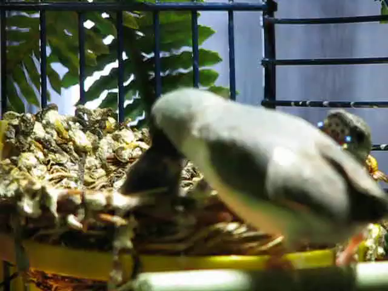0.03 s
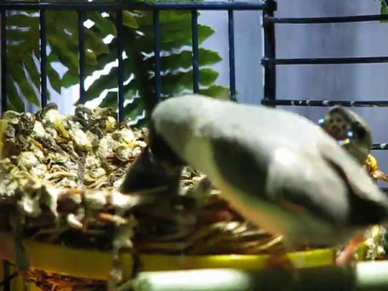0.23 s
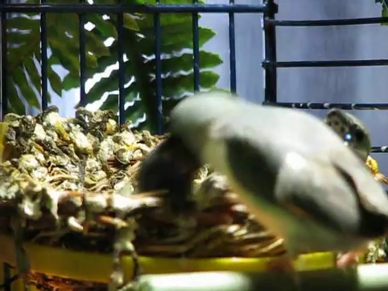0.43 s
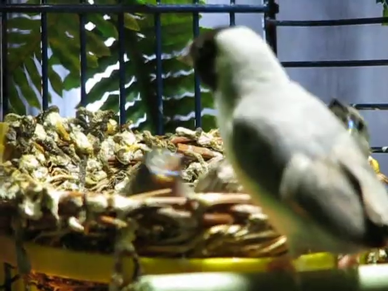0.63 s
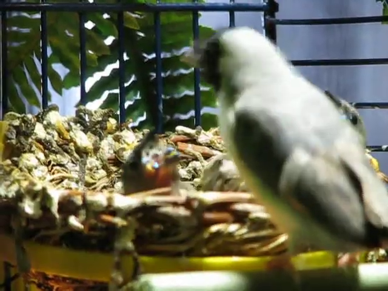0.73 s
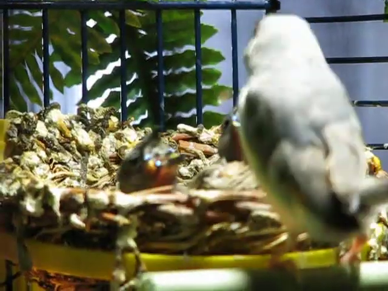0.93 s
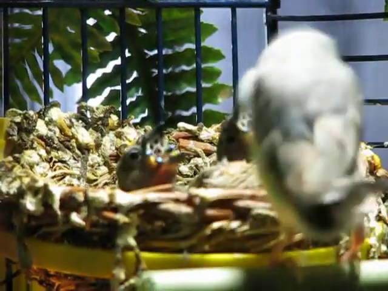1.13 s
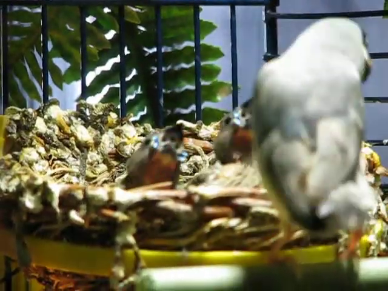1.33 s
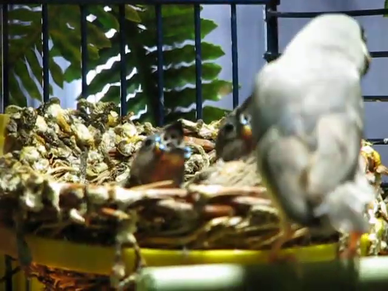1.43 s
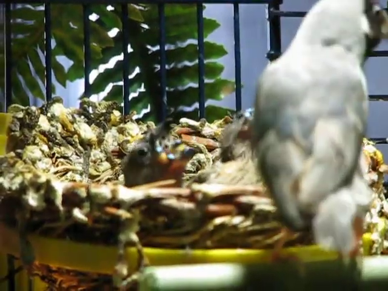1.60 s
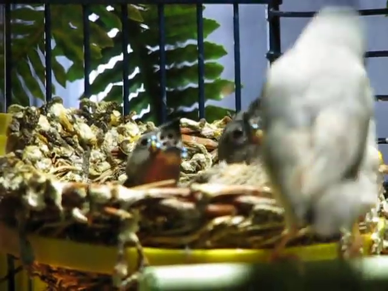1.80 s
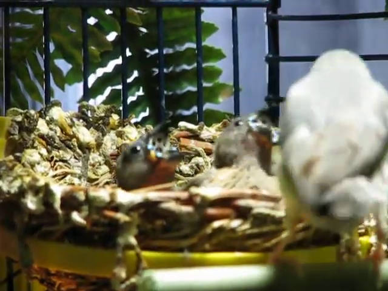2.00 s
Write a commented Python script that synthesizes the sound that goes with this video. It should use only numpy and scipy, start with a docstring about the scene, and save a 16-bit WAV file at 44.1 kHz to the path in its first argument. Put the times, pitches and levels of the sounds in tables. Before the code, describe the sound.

Two finch chicks beg close by in a cage indoors. From about 0.1 seconds, one gives shrill rising whistles that turn hoarse, about four a second. At 0.8 seconds the second chick joins with short raspy cries, about five a second, and both overlap until the end, around 2 seconds. The cage and room ring briefly. Faint household noise and hum continue underneath, with one tiny soft scuff near 0.3 seconds.

```python
"""Indoors, a nest in a cage: two finch chicks beg, close by.
Each cry is a shrill whistle with overtones, turning hoarse as the second side of the syrinx
joins in a little apart in pitch. The cage corner and the room ring briefly.
Behind them: faint household noise and hum, one soft scuff."""
import sys
import numpy as np
from scipy import signal
from scipy.fft import rfft, irfft
from scipy.io import wavfile

SR = 44100
rng = np.random.default_rng(int(sys.argv[2]) if len(sys.argv) > 2 else 0)


def wav_record(signal):
    """Record a signal, one row per channel, as 16-bit PCM in the file named by sys.argv[1]."""
    frames = np.transpose(np.atleast_2d(signal))
    bounded = np.clip(frames, -1, 1)
    # unit amplitude maps onto the largest positive 16-bit level
    quanta = np.round(bounded * 32767).astype(np.int16)
    wavfile.write(sys.argv[1], SR, quanta)


N = 90581
PREROLL = 8820  # samples before time zero
M = N + PREROLL
TIME_S = (np.arange(M) - PREROLL) / SR

# household noise spectrum: freq_hz, relative_db
HOUSE_SPECTRUM = [(25, -69), (90, -37), (170, -8), (500, -7.5), (1100, -10.5), (2300, -18.5), (8000, -23.5),
                  (15000, -43)]
# its stereo width: freq_hz, side_to_mid_db
HOUSE_SIDE = [(100, -24), (300, -21), (600, -14), (5000, -5)]
# hum lines: freq_hz, level_db
HUM_LINES = [(59, -74), (120, -76.5), (478, -60), (620, -63.5)]
# scuff spectrum: freq_hz, relative_db
SCUFF_SPECTRUM = [(1800, -30), (2600, -2), (3800, 0), (4600, -30)]
# open beak and microphone response: freq_hz, gain_db
BEAK_RESPONSE = [(800, -27.5), (1600, -13), (2700, -9.5), (3400, -10), (4200, -12.5), (6000, 5), (6800, 0),
                 (7800, 2.5), (9000, 1), (10000, -1.5), (11000, -7.5), (12500, -19.5), (16000, -17.5)]

# first chick, one contour per cry: time_s, pitch_hz, level_db
FIRST_CRIES = [
    [(-.04, 5440, -14), (.01, 5910, -30)],
    [(.137, 3566, -35), (.158, 4180, -20), (.18, 4200, -19), (.2, 5590, -23.5), (.226, 6035, -30.5),
     (.231, 6035, -22), (.258, 6320, -48.5)],
    [(.374, 3726, -22), (.397, 4410, -20), (.401, 3933, -12.5), (.409, 3970, -21.5), (.42, 4124, -19.5),
     (.437, 5730, -23.5), (.455, 6060, -30.5), (.466, 6220, -20), (.487, 6350, -31.5), (.5, 5800, -58)],
    [(.615, 3694, -28.5), (.635, 4310, -15), (.65, 3970, -19.5), (.67, 4750, -19.5), (.685, 5664, -22.5),
     (.705, 6145, -22.5), (.733, 5537, -34.5)],
    [(.912, 3835, -24), (.93, 3582, -23.5), (.956, 3625, -18.5), (.961, 3913, -10.5), (.99, 4212, -14),
     (1.035, 4040, -15.5), (1.06, 5110, -31.5), (1.085, 5250, -19.5), (1.098, 4600, -67)],
    [(1.157, 3450, -31), (1.168, 3948, -18.5), (1.195, 4216, -12.5), (1.22, 4300, -12.5),
     (1.25, 4944, -19.5), (1.285, 5060, -21), (1.3, 4730, -32)],
    [(1.418, 3942, -14.5), (1.45, 4220, -18.5), (1.48, 4870, -16.5), (1.54, 4936, -26.5), (1.55, 4730, -45)],
    [(1.642, 3890, -20.5), (1.68, 4316, -15.5), (1.715, 5020, -21.5), (1.745, 4950, -26), (1.77, 4200, -47)],
    [(1.9, 3653, -20), (1.912, 3904, -13), (1.94, 4146, -16), (1.99, 4503, -16.5), (2.03, 5070, -19.5),
     (2.06, 5000, -20)],
]
# voice break per cry: hoarseness_before, break_s, hoarseness_after
FIRST_BREAKS = [(.7, -.04, .7), (.6, .15, .8), (.25, .415, .8), (.4, .655, .8), (.4, 1, .9), (.3, 1.2, .95),
                (.45, 1.445, .95), (.6, 1.66, .95), (.65, 1.94, .95)]
# second side below the first, per cry, before wander: max_gap_hz
FIRST_GAPS_HZ = [570, 632, 614, 619, 804, 852, 739, 860, 779]
# harmonics 1-4: gain_db
FIRST_HARMONICS_DB = [3, -4, -8, -8.5]

# second chick, per cry: onset_s, lead_in_s, end_s, held_pitch_hz, level_db, drop_exponent
SECOND_CRIES = [(0.812, .024, 0.902, 3850, -19, 1), (1.008, .02, 1.103, 4300, -19, 1),
                (1.205, .015, 1.304, 3950, -19, 1), (1.397, .007, 1.55, 4100, -18, .3),
                (1.614, .016, 1.772, 4100, -18, .3), (1.821, .017, 1.915, 4060, -16, .3),
                (2.03, .014, 2.12, 4000, -21, .3)]
# opening climb: after_onset_s, pitch_ratio, gain_db
SECOND_CLIMB = [(.003, .84, -9), (.026, .92, -6), (.033, 1, -1)]
# closing drop: before_end_s, pitch_ratio, gain_db
SECOND_DROP = [(.02, 1.04, 0), (.009, .74, -12), (0, .52, -22)]
# roughness through a cry: after_onset_s, hoarseness
SECOND_HOARSENESS = [(-.002, 1.4), (.008, .4), (.024, .35), (.036, .65)]
# harmonics 1-4: gain_db
SECOND_HARMONICS_DB = [4.5, -3.5, -3, -2.5]

JITTER_HZ, JITTER_RAD, SHIMMER_HZ, SHIMMER_DB = 330, .7, 250, 3.5  # depths at hoarseness 1
GAP_FROM_HZ, GAP_SLOPE, GAP_MIN_HZ = 3450, .55, 120  # the sides part as pitch rises
GAP_WANDER_HZ, GAP_WANDER_RATIO = 54.3, .171
SIDE_SIGNS = np.array([[1], [-1]])


def undb(db):
    """Decibels to amplitude."""
    return 10 ** (np.asarray(db) / 20)


def colour(x, points):
    """Filter by (freq_hz, gain_db) points."""
    hz, db = np.array(points, float).T
    bins_hz = np.maximum(np.arange(x.shape[-1] // 2 + 1) * SR / x.shape[-1], 1)
    return irfft(rfft(x) * undb(np.interp(np.log(bins_hz), np.log(hz), db)), x.shape[-1])


def wobble(cutoff_hz):
    """Low-passed random motion, unit spread."""
    x = signal.sosfilt(signal.butter(4, cutoff_hz, fs=SR, output="sos"), rng.standard_normal(M))
    return x / x.std()


def house(noise_db=-56, waver_hz=15):
    """Steady household noise with wavering hum lines."""
    mid, side = colour(rng.standard_normal((2, M)), HOUSE_SPECTRUM)
    noise = (mid + colour(side, HOUSE_SIDE) * SIDE_SIGNS) * undb(noise_db) / mid.std()
    hum = np.zeros(M)
    for hz, db in HUM_LINES:
        phase = 2 * np.pi * hz * TIME_S
        hum += undb(db) * (wobble(waver_hz) * np.sin(phase) + wobble(waver_hz) * np.cos(phase))
    return noise + hum


def scuff(start_s=.329, length_s=.016, level_db=-51):
    """One soft brush of noise."""
    progress = (TIME_S - start_s) / length_s
    envelope = np.clip(5 * np.minimum(progress, 1 - progress), 0, 1)
    noise = colour(rng.standard_normal(M), SCUFF_SPECTRUM)
    return undb(level_db) * envelope * noise / noise.std()


def reflections(x, t60_s, level_db=-6, width=.83):
    """Dense decaying echoes, partly different left and right."""
    t = np.arange(SR // 2) / SR
    mid, side = rng.standard_normal((2, len(t))) * undb(-60 * t / t60_s) * (t > .001)
    tail = (mid + width * side * SIDE_SIGNS) * undb(level_db) / np.sqrt(np.sum(mid ** 2))
    return signal.fftconvolve(x[None], tail, axes=1)[:, :M]


def cage_and_room(x, pan_db, cage_t60_s=.005, room_t60_s=.16):
    """Panned direct sound plus cage and room reflections."""
    direct = x * undb(SIDE_SIGNS * pan_db / 2)
    return direct + reflections(x, cage_t60_s) + reflections(x, room_t60_s)


def syrinx(cries, hoarseness, gaps_hz, harmonics_db, rasp_db, b_root_db, mixing_db=-16, fade_s=.002):
    """Side a whistles over breath noise; with hoarseness, side b joins and both shake."""
    wander = 1 + GAP_WANDER_RATIO * wobble(GAP_WANDER_HZ)
    jitter_a, jitter_b = (JITTER_RAD * wobble(JITTER_HZ) for _ in range(2))
    shimmer_a, shimmer_b = (SHIMMER_DB * wobble(SHIMMER_HZ) for _ in range(2))
    breath = undb(rasp_db) * rng.standard_normal(M)
    out = np.zeros(M)
    for cry, hoarse_points, max_gap_hz in zip(cries, hoarseness, gaps_hz):
        knots_s, hz, db = np.array(cry, float).T
        knots_s = np.sort(knots_s)
        on = slice(*np.searchsorted(TIME_S, knots_s[[0, -1]]))
        t = TIME_S[on]
        hoarse = np.interp(t, *np.transpose(hoarse_points))
        pitch_hz = np.interp(t, knots_s, hz)
        gap_hz = max_gap_hz  # negative: side b sings above, at any pitch
        if max_gap_hz > 0:
            gap_hz = np.clip(GAP_SLOPE * (pitch_hz - GAP_FROM_HZ), GAP_MIN_HZ, max_gap_hz)
        phase_a = 2 * np.pi * np.cumsum(pitch_hz) / SR + hoarse * jitter_a[on]
        phase_b = 2 * np.pi * np.cumsum(pitch_hz - gap_hz * wander[on]) / SR + hoarse * jitter_b[on]
        depth = np.minimum(hoarse, 1)
        b_strength = 1.7 * depth ** 2
        amp_a = undb(depth * shimmer_a[on])
        amp_b = undb(depth * shimmer_b[on]) * b_strength
        tone = np.zeros(len(t))
        for k, gain_db in enumerate(harmonics_db, 1):
            side_a = amp_a * np.sin(k * phase_a)
            side_b = amp_b * np.sin(k * phase_b) * undb(b_root_db if k == 1 else 0)
            difference_tone = np.sin((k + 1) * phase_a - phase_b)
            sum_tone = np.sin((k - 1) * phase_a + phase_b) * (k > 1)
            mixing = undb(mixing_db) * amp_a * amp_b * (difference_tone + sum_tone)
            tone += undb(gain_db) * (side_a + side_b + mixing)
        tone *= 1 + 1.8 * np.maximum(hoarse - 1, 0) * np.cos(phase_a / 2)  # period doubling
        fade = np.clip(np.minimum(t - knots_s[0], knots_s[-1] - t) / fade_s, 0, 1)
        envelope = fade * undb(np.interp(t, knots_s, db))
        out[on] += envelope * (tone / np.sqrt(1 + b_strength ** 2) + breath[on])
    return colour(out, BEAK_RESPONSE)


def second_chick(gap_hz=-390):
    """Each cry creeps in low, climbs, holds and drops; roughest at the start."""
    cries, hoarseness = [], []
    for onset_s, lead_s, end_s, held_hz, level_db, exponent in SECOND_CRIES:
        lead_in = [(onset_s - lead_s, .66, -21), (onset_s, .77, -15)]
        climb = [(onset_s + s, ratio, db) for s, ratio, db in SECOND_CLIMB]
        drop = [(end_s - s, ratio ** exponent, db) for s, ratio, db in SECOND_DROP]
        cries.append([(s, held_hz * ratio, level_db + db) for s, ratio, db in lead_in + climb + drop])
        hoarseness.append([(onset_s + s, hoarse) for s, hoarse in SECOND_HOARSENESS])
    gaps_hz = [gap_hz] * len(cries)
    return syrinx(cries, hoarseness, gaps_hz, SECOND_HARMONICS_DB, rasp_db=-16.5, b_root_db=-10)


def first_chick(half_break_s=.026):
    """Rising cries that break into hoarseness."""
    hoarseness = [[(s - half_break_s, before), (s + half_break_s, after)]
                  for before, s, after in FIRST_BREAKS]
    return syrinx(FIRST_CRIES, hoarseness, FIRST_GAPS_HZ, FIRST_HARMONICS_DB, rasp_db=-13.5, b_root_db=0)


def scene():
    """Both chicks and the scuff in the cage, over the house."""
    first, second = first_chick(), second_chick()
    nest = cage_and_room(first + scuff(), pan_db=.3) + cage_and_room(second, pan_db=2)
    return (nest + house())[:, PREROLL:]


def record(dry, opens_s=.071, fade_s=.0029, cutoff_hz=15550):
    """Short opening silence, then a steep low-pass."""
    gate = np.clip((np.arange(N) / SR - opens_s) / fade_s, 0, 1)
    return signal.sosfilt(signal.ellip(10, .2, 80, cutoff_hz, fs=SR, output="sos"), dry * gate)


dry = scene()
out = record(dry)
wav_record(out)
```